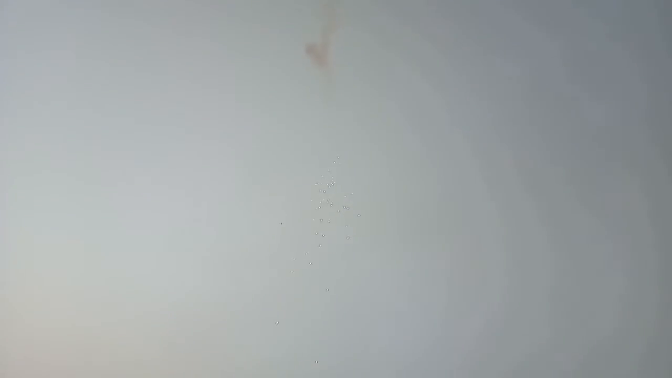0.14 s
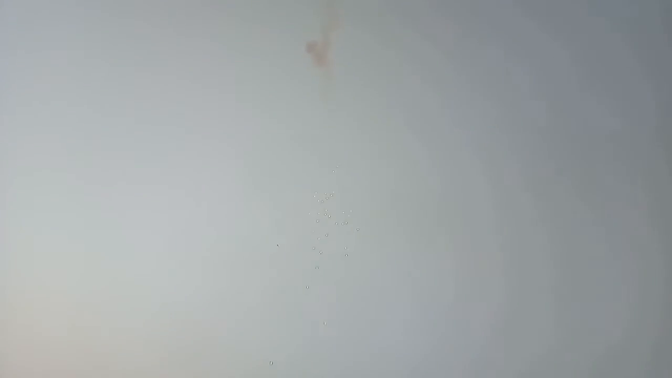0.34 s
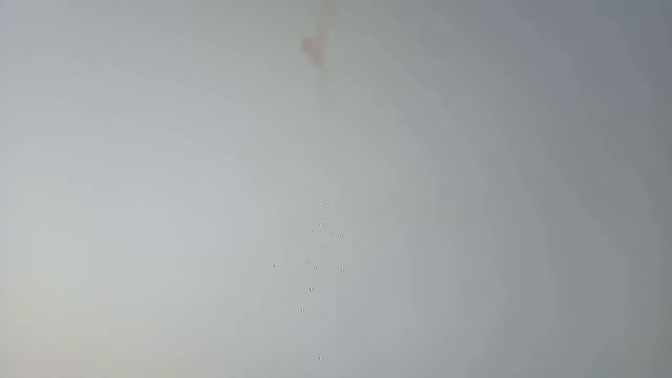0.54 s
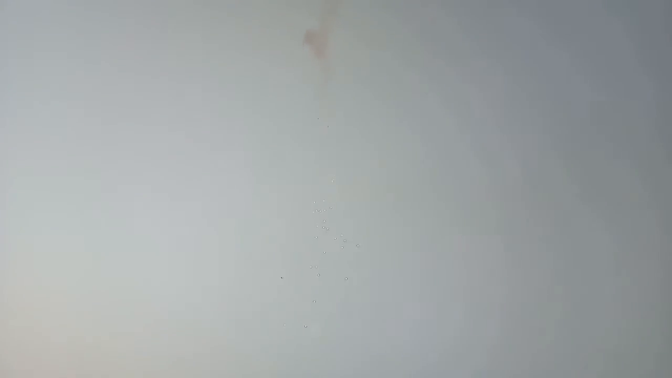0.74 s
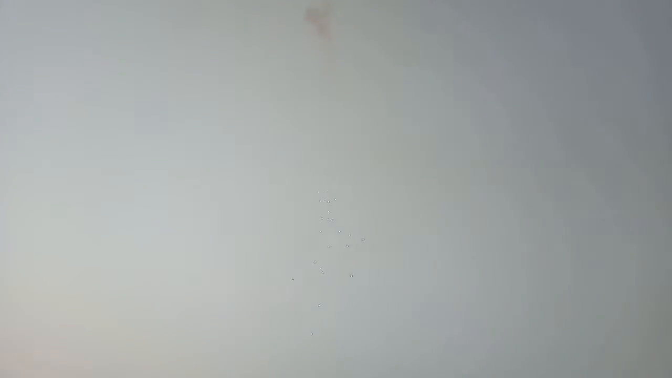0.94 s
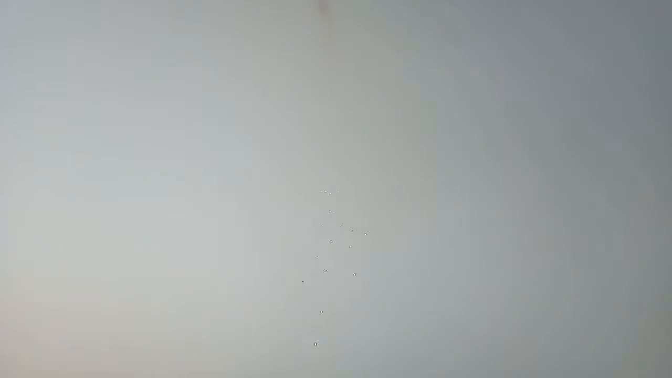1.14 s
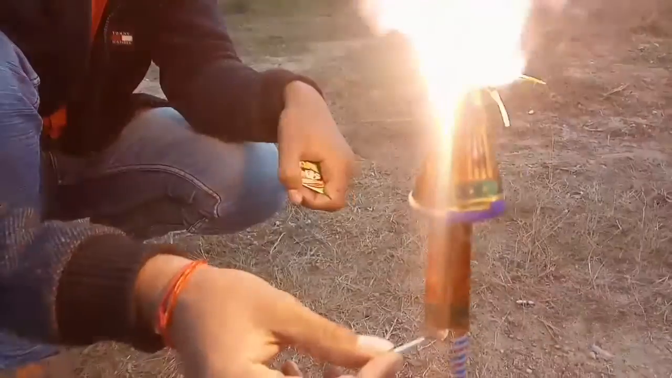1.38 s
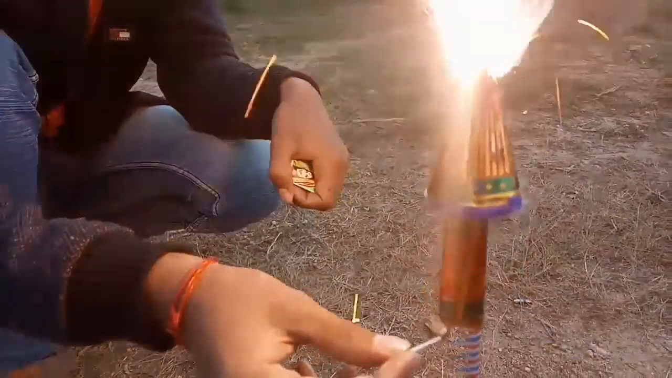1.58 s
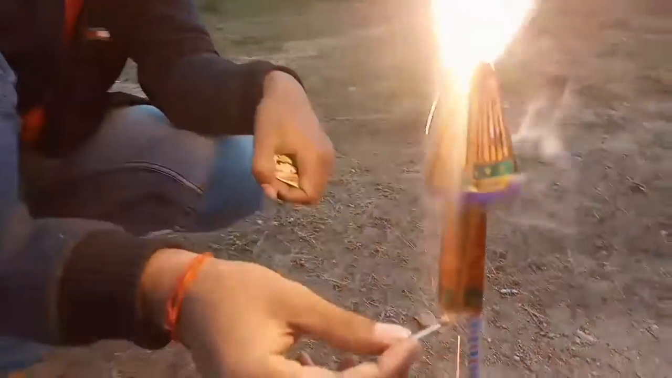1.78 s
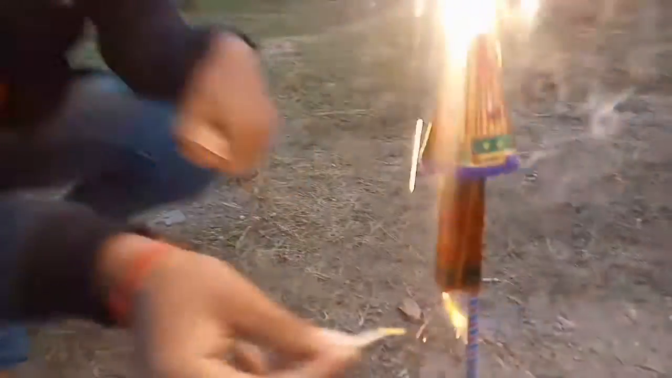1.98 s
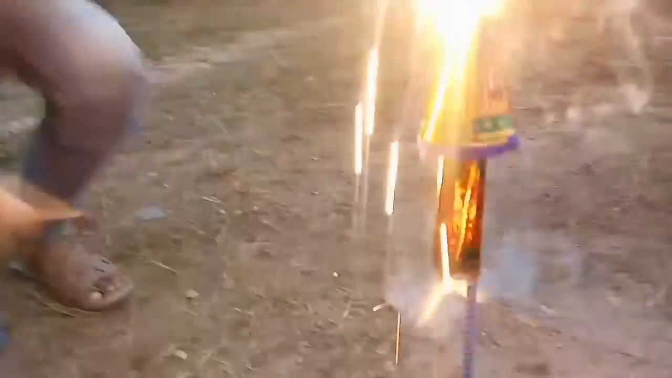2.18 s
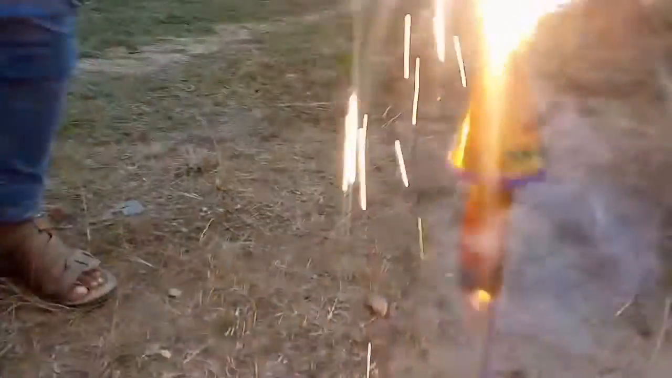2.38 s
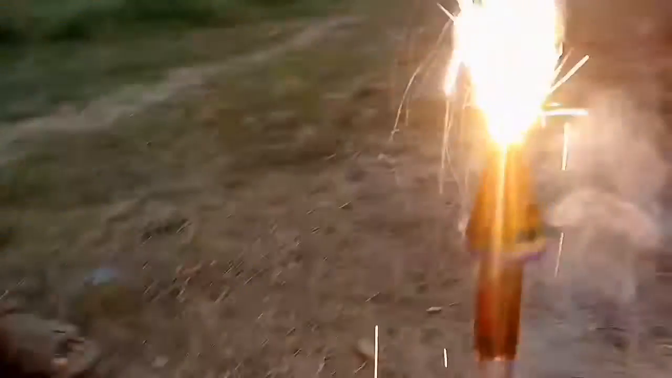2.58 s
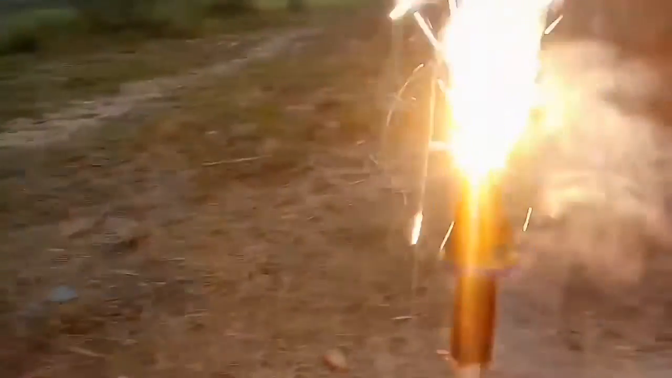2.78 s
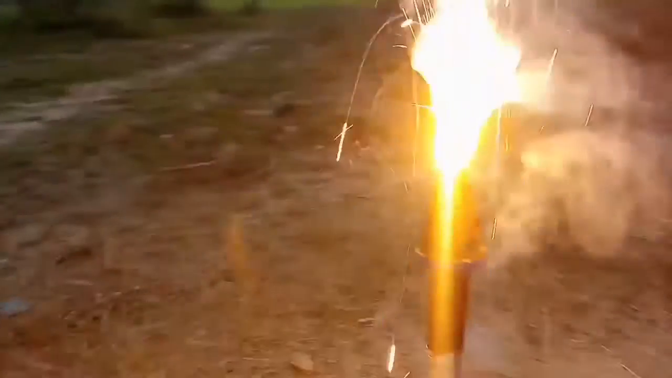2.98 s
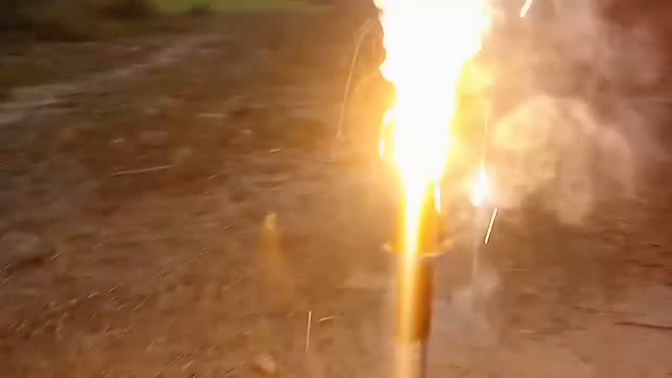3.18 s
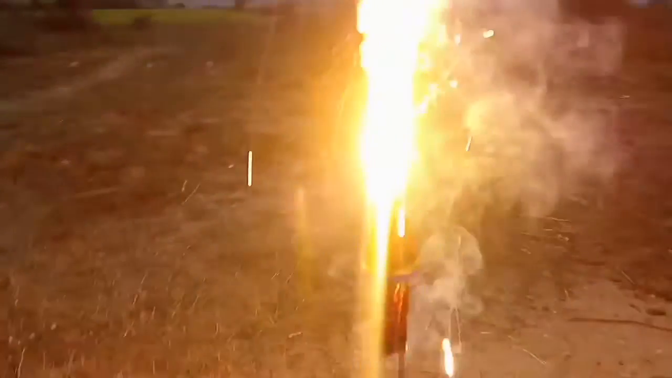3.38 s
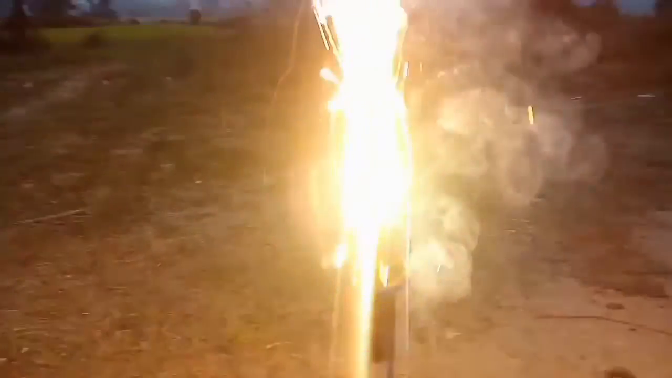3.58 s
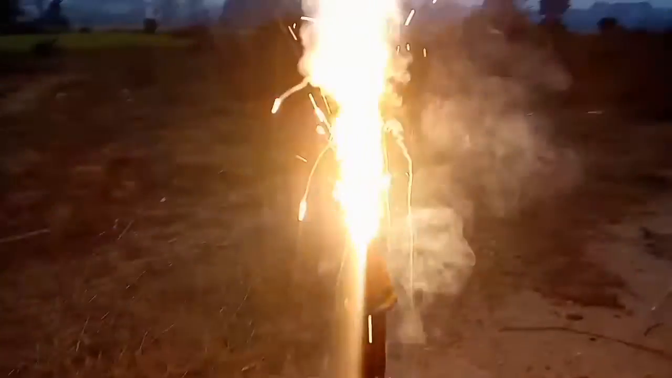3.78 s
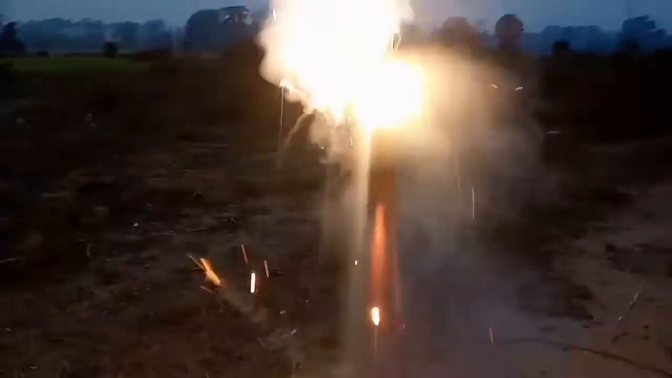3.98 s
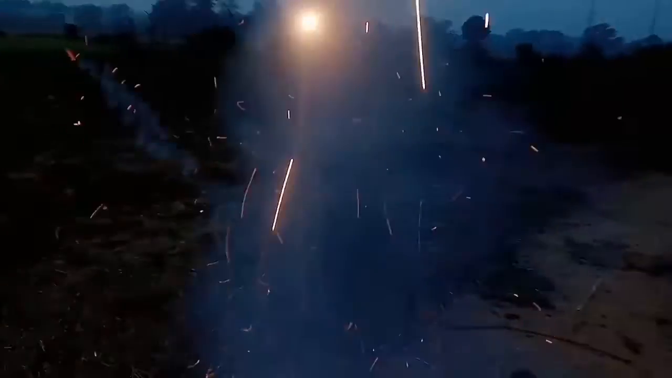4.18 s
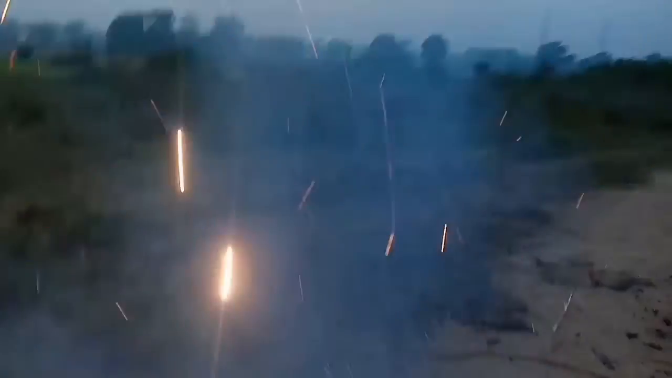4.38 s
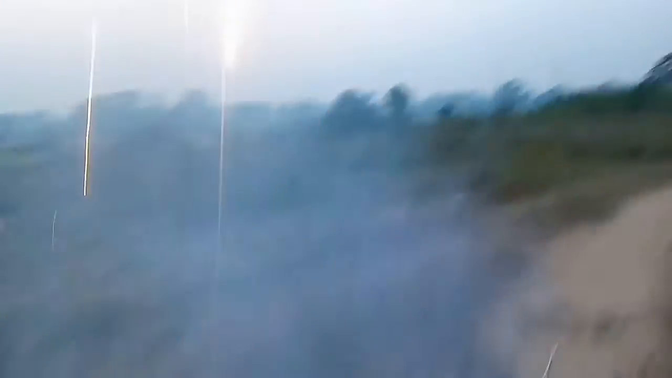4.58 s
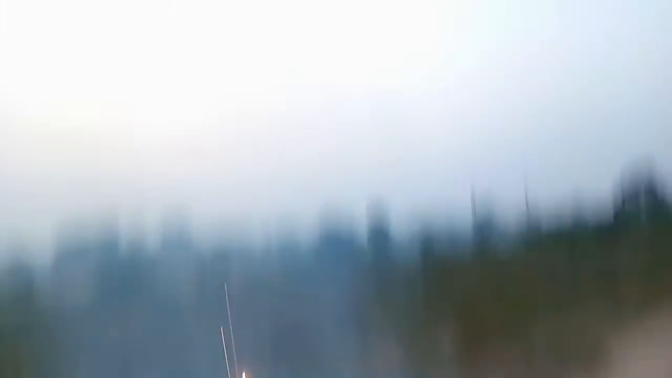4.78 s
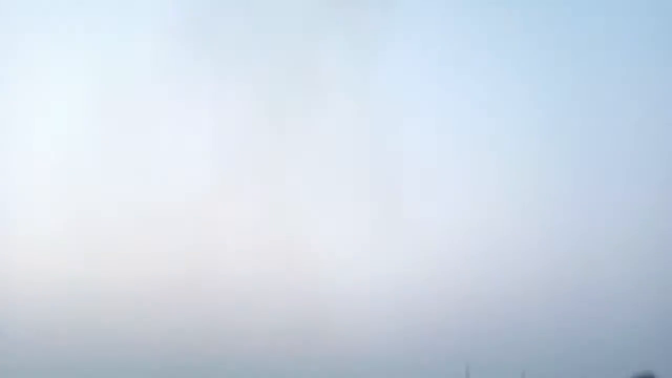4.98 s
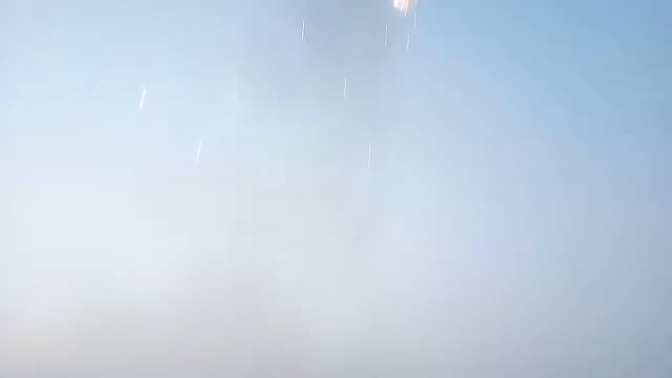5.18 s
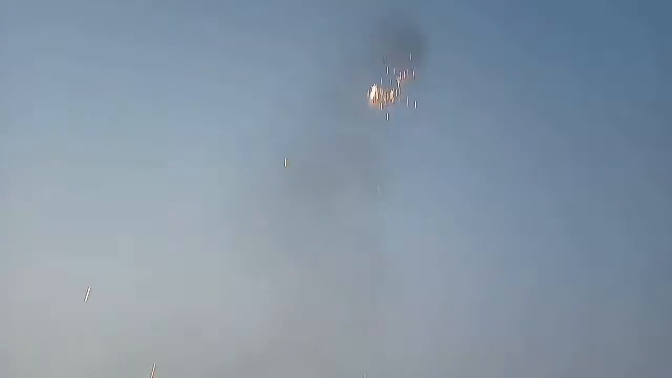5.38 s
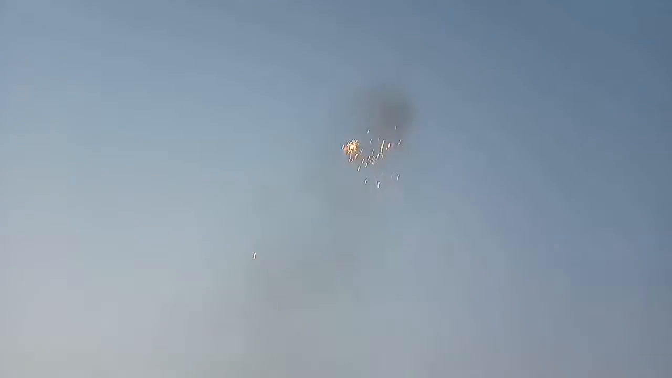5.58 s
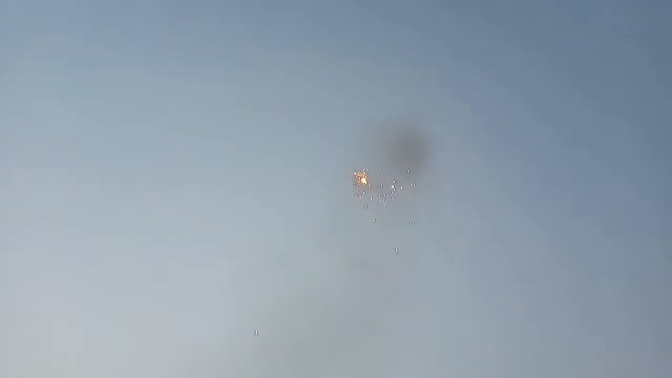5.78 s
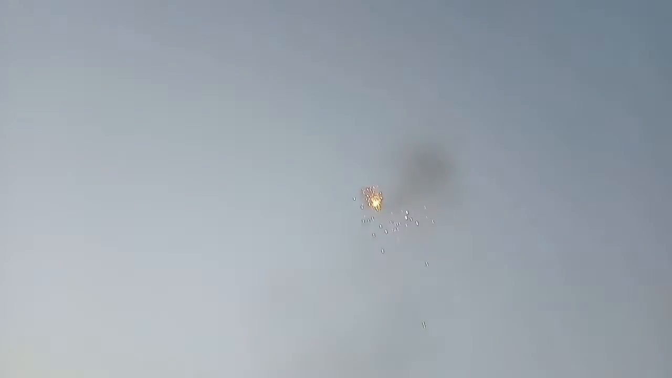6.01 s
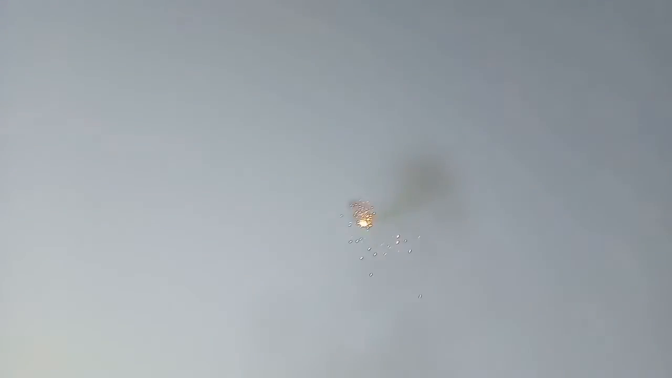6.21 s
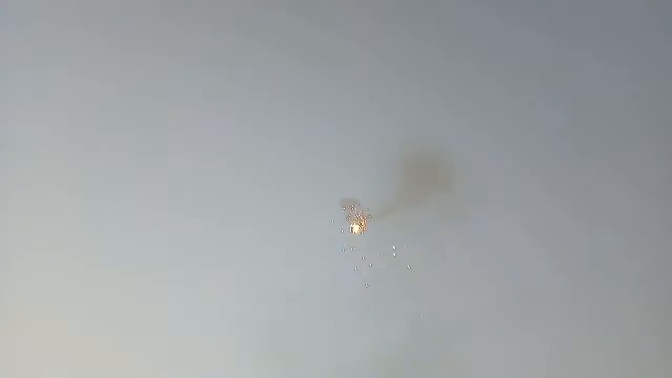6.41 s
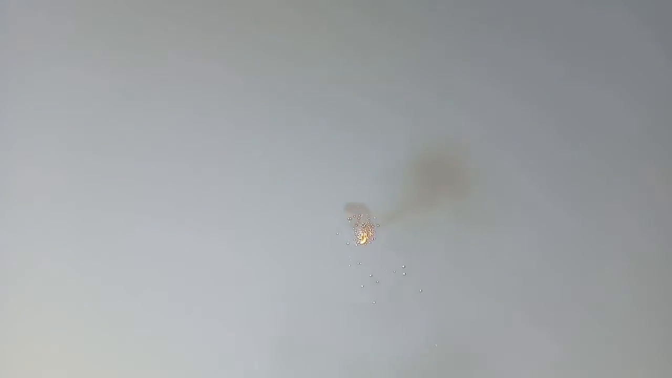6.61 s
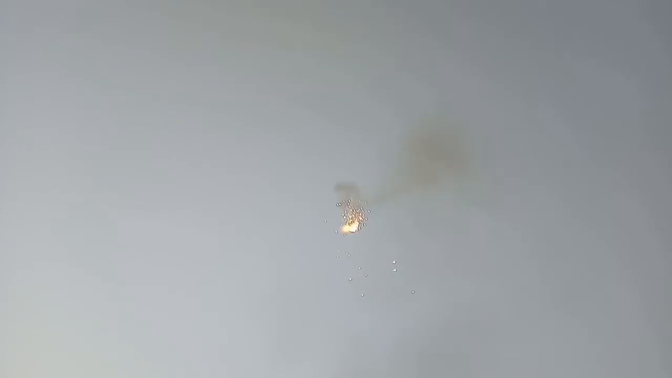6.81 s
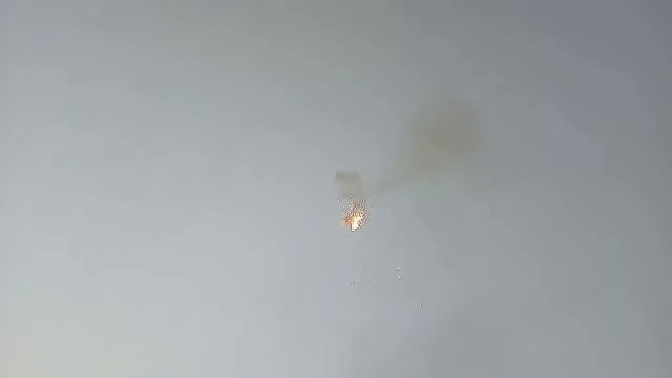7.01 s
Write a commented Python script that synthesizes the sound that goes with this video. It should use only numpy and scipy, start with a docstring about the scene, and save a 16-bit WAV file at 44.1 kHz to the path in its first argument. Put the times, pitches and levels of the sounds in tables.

```python
"""A field at dusk: crickets trill, a far bird whistles and a horn toots twice; the sound fades out and returns.
A fountain firework hisses, pops and snaps, made of noise, grains and clicks; the rocket under it spits, then roars.
As the rocket climbs, its ground echo lags more and more (a falling whoosh) and the air dulls it.
Two far cracks and a hollow rattle follow. Crickets, bird and horn are gliding or steady tones."""
import sys
import numpy as np
from scipy import signal
from scipy.fft import rfft, irfft
from scipy.io import wavfile
from scipy.ndimage import uniform_filter1d, minimum_filter1d

SR = 44100
rng = np.random.default_rng(int(sys.argv[2]) if len(sys.argv) > 2 else 0)


def unload_audio(sound):
    """Save the sound as a 16-bit wav file, at the path given as the first command line argument."""
    columns = np.transpose(np.atleast_2d(sound))
    # keep every value between -1 and 1, then stretch to whole-number steps
    steps = np.round(np.clip(columns, -1, 1) * 32767)
    wavfile.write(sys.argv[1], SR, steps.astype(np.int16))


N = 310905
TIME = np.arange(N) / SR
FREQS = np.maximum(np.fft.rfftfreq(N, 1 / SR), 1)
# All levels in the tables are those of the sources, before echo, air, fades and limiter.


def from_db(db):
    """Turn decibels into a factor for the sound pressure."""
    return 10 ** (np.asarray(db) / 20)


def rms_one(x):
    """Scale a signal so that its average power is one."""
    return x / np.sqrt(np.mean(x ** 2) + 1e-20)


def in_time(rows):
    """Draw straight lines between the rows and read every column at each sample."""
    t, *columns = np.transpose(rows)
    return [np.interp(TIME, t, column) for column in columns]


def ramp(start, length):
    """Rise from zero to one and stay there."""
    return np.clip((TIME - start) / length, 0, 1)


def span(start, end, edge):
    """Slope up after the start, stay at one, and slope down after the end."""
    return np.clip((TIME - start) / edge, 0, 1) * np.clip((end - TIME) / edge + 1, 0, 1)


def swell(middle, half_length):
    """Rise and fall in the shape of a bell."""
    return np.exp(-np.minimum(((TIME - middle) / half_length) ** 2 / 2, 50))


def band(x, low_hz, high_hz, order=2):
    """Keep mainly what lies between two frequencies."""
    edges = [low_hz, min(high_hz, .45 * SR)]
    return signal.sosfilt(signal.butter(order, edges, "band", fs=SR, output="sos"), x + 1e-18)


def drift(rate_hz):
    """Wander slowly and at random, with a spread of one."""
    return rms_one(irfft(rfft(rng.standard_normal(N)) / (1 + (FREQS / rate_hz) ** 2), N))


def coloured(x, spectrum, measured_in):
    """Give a sound its tone colour, with unit power inside one band (f/Hz, f/Hz)."""
    f, level_db = np.transpose(spectrum)
    shaped = rfft(x) * from_db(np.interp(np.log(FREQS), np.log(f), level_db))
    inside = (FREQS > measured_in[0]) & (FREQS < measured_in[1])
    return irfft(shaped, N) / np.std(irfft(shaped * inside, N))


def clicks(rows):
    """Place one single-sample click for each row (t/s, level/dB)."""
    out = np.zeros(N)
    for t, level_db in rows:
        out[round(t * SR)] += from_db(level_db)
    return out


def scattered(x, t60):
    """Scattering sends back many tiny echoes, which fade by 60 dB in t60 seconds."""
    age = TIME[:SR // 2]
    tail = rng.standard_normal(len(age)) * from_db(-60 * age / t60)
    return signal.fftconvolve(x, tail / np.linalg.norm(tail))[:N]


# colour of the low background rumble: f/Hz, level/dB (per Hz)
FIELD_COLOUR = [(25, -14.5), (85, 0.5), (160, -4.5), (235, -21.5), (400, -19), (1400, -29.5), (2200, -45),
                (5000, -46)]
FIELD_DB = -62.5


def field():
    """Low rumble lies under patchy far noise, with one faint rustle early on."""
    rumble = coloured(rng.standard_normal(N) * from_db(1.27 * drift(3.4)), FIELD_COLOUR, (40, 250))
    dip = 1 - span(4.3, 4.7, .25)  # the rumble goes away for a moment
    edges = np.geomspace(300, 3500, num=8)
    patches = np.zeros(N)
    for low, high in zip(edges, edges[1:]):
        noise = band(rng.standard_normal(N), low, high)
        weaker_with_pitch = (low / edges[0]) ** -.9
        patches += noise * from_db(3.2 * drift(10)) * weaker_with_pitch
    rustle = span(0.12, 0.35, 0.064) * rms_one(band(rng.standard_normal(N), 330, 1060))
    return from_db(FIELD_DB) * rumble * dip + from_db(-74.0) * rms_one(patches) + from_db(-69) * rustle


def wing_strokes(per_s, start_hz, end_hz, unevenness, force_db, sharpness):
    """Each wing stroke is a short tone sliding in pitch, with its own length and force; unit power."""
    count = np.cumsum(per_s * (1 + unevenness * drift(30))) / SR
    stroke = count % 1  # how far the present stroke has got
    force = from_db(force_db * rng.standard_normal(N))[count.astype(int)]
    hz = (start_hz + (end_hz - start_hz) * stroke) * (1 + 0.021 * drift(297.8))
    tone = np.sin(2 * np.pi * np.cumsum(hz) / SR)
    return rms_one(force * np.sin(np.pi * stroke) ** sharpness * tone)


# trilling crickets: pulse rate/Hz, f at pulse start/Hz, f at pulse end/Hz, level/dB
CRICKET_TRILLS = [(34.6, 7200, 5600, -67.5), (44.3, 6800, 5300, -70.5), (88.4, 8400, 6300, -70.5),
                  (104, 7400, 5000, -67.5)]
# chirps of a lower-pitched cricket: t of middle/s, level/dB
LOW_CHIRPS = [(0.049, -80), (.22, -79.5), (.645, -74.5), (.88, -74.5), (1.115, -74.5), (1.34, -79),
              (1.55, -82)]


def crickets():
    """Wing strokes make a chorus of trills and one lower chirp, all smeared by the grass."""
    insects = np.zeros(N)
    for per_s, start_hz, end_hz, level_db in CRICKET_TRILLS:
        trill = wing_strokes(per_s, start_hz, end_hz, unevenness=0.11, force_db=3.0, sharpness=1.2)
        insects += from_db(level_db) * trill
    chirping = sum(from_db(level_db) * span(t - .075, t + 0.054, .03) for t, level_db in LOW_CHIRPS)
    insects += chirping * wing_strokes(56, 4750, 3900, unevenness=.08, force_db=2, sharpness=4)
    return insects + from_db(-3.5) * scattered(insects, t60=0.032)


# bird whistles: t start/s, t end/s, t of the arch's crest/s, f at crest/Hz, level/dB
BIRD_WHISTLES = [(0.467, 0.53, 0.57, 1380, -65), (0.96, 1.03, 1.02, 1430, -74),
                 (1.182, 1.45, 1.34, 1524, -64)]
ARCH_HZ_PER_S2, SAG_DB_PER_S, WHISTLE_EDGE_S = 17000, 30, 0.025


def bird():
    """Far whistles follow an arch in pitch, waver a little and weaken as they go."""
    out, waver = np.zeros(N), 1 + 0.0093 * drift(60)
    for start, end, crest_t, crest_hz, level_db in BIRD_WHISTLES:
        held = np.clip(TIME, start, end + WHISTLE_EDGE_S)
        hz = (crest_hz - ARCH_HZ_PER_S2 * (held - crest_t) ** 2) * waver
        gain = from_db(level_db - SAG_DB_PER_S * (held - start)) * span(start, end, WHISTLE_EDGE_S)
        out += gain * np.sin(2 * np.pi * np.cumsum(hz) / SR)
    return out


# horn toots: t start/s, t end/s, f/Hz, level/dB
HORN_TOOTS = [(0.597, 0.69, 849, -64), (1.106, 1.203, 854, -61)]
# the horn's overtones: multiple of the pitch, level/dB
HORN_OVERTONES = [(1, -5.5), (2, -2), (3, -7.5)]


def horn():
    """A far vehicle horn toots twice: a few overtones on one slightly unsteady pitch."""
    out = np.zeros(N)
    for start, end, pitch_hz, level_db in HORN_TOOTS:
        phase = 2 * np.pi * np.cumsum(pitch_hz * (1 + .001 * drift(30))) / SR
        tone = np.zeros(N)
        for multiple, overtone_db in HORN_OVERTONES:
            tone += np.sqrt(2) * from_db(level_db + overtone_db) * np.sin(multiple * phase)
        out += span(start, end, 0.014) * tone
    return out


def burning(grains_per_s, grain_share, flutter_db, flutter_rate):
    """Rushing gas is noise, burning powder grains are tiny random clicks; both flutter together."""
    sizes = from_db(4 * np.minimum(rng.exponential(1, N), 4)) * rng.choice([-1, 1], N)
    grains = rms_one(sizes * (rng.random(N) < grains_per_s / SR))
    return (rng.standard_normal(N) + grain_share * grains) * from_db(flutter_db * drift(flutter_rate))


# how the fountain burns: t/s, spray level/dB, flame level/dB
FOUNTAIN_BURN = [(2.84, -53.5, -64), (2.98, -57, -66.5), (3.22, -52.5, -59), (3.68, -54, -60),
                 (3.94, -49.5, -50.5)]
# colour of the spark spray: f/Hz, level/dB (per Hz)
SPRAY_COLOUR = [(300, -14), (900, -3), (1600, -1.5), (2500, -2), (5000, 1.5), (9000, -2), (14000, -11.5),
                (16000, 1.5)]
# colour of the flame's rumble: f/Hz, level/dB (per Hz)
FLAME_COLOUR = [(30, -15), (75, -16), (150, 4), (230, -2), (400, -3.5), (800, -11), (2000, -35)]


def fountain():
    """A gritty spray of sparks hisses over a soft flame, until the motor takes over."""
    spray_db, flame_db = in_time(FOUNTAIN_BURN)
    sparks = burning(grains_per_s=2500, grain_share=0.86, flutter_db=0.8, flutter_rate=150)
    spray = coloured(sparks, SPRAY_COLOUR, (2500, 12000))
    flame = coloured(rng.standard_normal(N), FLAME_COLOUR, (100, 700))
    return (from_db(spray_db) * spray + from_db(flame_db) * flame) * span(2.0, 3.95, 0.01405)


# sparks that snap close by: t/s, level/dB (of the click before filtering)
SPARK_SNAPS = [(2.2334, -19.5), (2.58, -26), (2.9251, -14.5), (2.9443, -12.5), (3.3918, -28)]


def snaps():
    """Single sparks burst with a very short, bright tick."""
    return band(clicks(SPARK_SNAPS), 2800, 14000, order=1)


# spits of burning powder: t/s, hiss level/dB, thump level/dB, half length/s
POWDER_SPITS = [(2.241, -47, -50, 0.014), (2.633, -49, -64.5, 0.0054), (3.732, -45, -60, 0.003),
                (3.748, -46.5, -63, 0.0057), (3.772, -58, -48.5, 0.011), (3.932, -48.5, -60, 0.019),
                (3.9654, -27.5, -33.5, 0.0021), (3.989, -22, -18.5, 0.0031), (4.012, -22, -20, 0.003),
                (6.38, -55.5, -80, 0.061)]


def spits():
    """Gas swells briefly: a hiss over a thump that reaches into the middle range."""
    hiss, thump = np.zeros(N), np.zeros(N)
    for t, hiss_db, thump_db, half_length in POWDER_SPITS:
        gas = swell(t, half_length)
        hiss += from_db(hiss_db) * gas
        thump += from_db(thump_db) * gas
    high = rms_one(band(rng.standard_normal(N), 3730, 7950))
    middle = rms_one(band(rng.standard_normal(N), 970, 4600))
    low = rms_one(band(rng.standard_normal(N), 75, 920))
    return hiss * high + thump * (low + 0.74 * middle)


# soft pops, each repeated once: t of the first/s, f/Hz, level/dB
SOFT_POPS = [(2.854, 1504, -49), (3.04, 1497, -49), (3.256, 805, -42), (3.445, 1800, -45.5)]
REPEAT_GAP_S, POP_S = 0.018, 0.00072


def pops():
    """Soft pops in the fountain, each heard again after a short fixed gap; every one a very short, rounded tone."""
    out = np.zeros(N)
    for first, hz, level_db in SOFT_POPS:
        for t in (first, first + REPEAT_GAP_S):
            out += from_db(level_db) * swell(t, POP_S) * np.sin(2 * np.pi * hz * (TIME - t))
    return out


# the motor lights, burns for under a second and dies away
IGNITION_S, BURNOUT_S, DYING_DB_PER_S = 3.983, 4.84, 49.5


def launch(full_db, build_db, build_s, leave_s, leaving_s, drop_db):
    """One part of the motor's sound builds with thrust, drops as the rocket leaves and dies after burnout."""
    building = build_db * (1 - ramp(IGNITION_S, build_s))
    leaving = drop_db * ramp(leave_s, leaving_s)
    dying = DYING_DB_PER_S * np.maximum(TIME - BURNOUT_S, 0)
    return from_db(full_db - building - leaving - dying)


def through_air(x, loss_db, shimmer_db):
    """Eddies make narrow bands swell and sink; air dulls with frequency squared (loss given at 10 kHz)."""
    hz, t, frames = signal.stft(x, SR, nperseg=1024)
    loss = np.outer((hz / 10000) ** 2, np.interp(t, TIME, loss_db))
    eddies = uniform_filter1d(rng.standard_normal(frames.shape), size=4, axis=0)
    eddies = uniform_filter1d(eddies, size=12, axis=1)
    shimmer = rms_one(from_db(shimmer_db * rms_one(eddies)))
    return signal.istft(frames * shimmer * from_db(-loss), SR)[1][:N]


# colours of the motor's lumpy roar, bright jet, nozzle hiss and low buffeting: f/Hz, level/dB (per Hz)
ROAR_COLOUR = [(60, -33.5), (150, -8.5), (290, -4.5), (420, -1.5), (620, -1), (800, 0), (1200, -1),
               (1800, -4.5), (3000, -12), (6000, -54)]
JET_COLOUR = [(500, -27), (1200, -3.5), (1800, -1.5), (2400, -1), (3600, 0.5), (5000, -0.5), (7500, -3.5),
              (9500, -10.5), (13500, -17), (16000, -11.5)]
NOZZLE_COLOUR = [(2500, -26), (4500, -8), (5700, -2), (6700, -3), (7800, -7), (9500, -18), (14000, -20.5),
                 (16000, -5)]
BLAST_COLOUR = [(25, -18), (75, -10.5), (100, -1), (160, 0), (220, -6.5), (380, -3), (900, -28)]
# stumbles while lifting off: t/s, depth of the dip level/dB
LIFTOFF_STUMBLES = [(4.234, 4), (4.342, 13.5)]
STUMBLE_S = 0.011
# flares of the fountain high up: t/s, level/dB, half length/s
HIGH_FLARES = [(6.08, -66.5, 0.15), (6.325, -62.5, 0.091), (6.763, -63.5, 0.055)]
# high up the fountain burns on, slowly receding
ALOFT_ROAR_DB, ALOFT_JET_DB, RECEDING_DB_PER_S = -56, -67.5, 1.42
# treble lost at 10 kHz in flight, and the further loss when the sound dulls near the top
AIR_LOSS_DB, TOP_LOSS_DB, DULLS_AT_S, DULLING_S = 1.0, 11, 6.5, 0.43


def rocket():
    """The motor lights at once: roar and jet, with nozzle hiss and buffeting near the ground."""
    roar = burning(grains_per_s=540, grain_share=0.23, flutter_db=-0.1, flutter_rate=54)
    roar = coloured(roar, ROAR_COLOUR, (250, 1400))
    jet = burning(grains_per_s=5000, grain_share=0.39, flutter_db=1.0, flutter_rate=93)
    jet = coloured(jet, JET_COLOUR, (1800, 5000))
    nozzle = coloured(rng.standard_normal(N) * from_db(2.6 * drift(120)), NOZZLE_COLOUR, (5700, 7800))
    blast = coloured(rng.standard_normal(N) * from_db(4.2 * drift(25)), BLAST_COLOUR, (40, 220))
    stumbling = from_db(-sum(dip_db * swell(t, STUMBLE_S) for t, dip_db in LIFTOFF_STUMBLES))

    motor = roar * stumbling * launch(full_db=-20.5, build_db=19, build_s=0.2,
                                      leave_s=4.38, leaving_s=0.063, drop_db=19.5)
    motor += jet * launch(full_db=-19.5, build_db=13.5, build_s=0.29,
                          leave_s=4.364, leaving_s=0.17, drop_db=12.5)
    near_ground = nozzle * launch(full_db=-23.5, build_db=6.0, build_s=0.089,
                                  leave_s=4.17, leaving_s=0.15, drop_db=6)
    near_ground += blast * stumbling * launch(full_db=-30, build_db=5, build_s=0.25,
                                              leave_s=4.42, leaving_s=0.066, drop_db=21.5)

    receding = from_db(-RECEDING_DB_PER_S * (TIME - BURNOUT_S)) * ramp(BURNOUT_S, 0.52)
    flaring = sum(from_db(level_db) * swell(t, half_length) for t, level_db, half_length in HIGH_FLARES)
    aloft = receding * (from_db(ALOFT_ROAR_DB) * roar + from_db(ALOFT_JET_DB) * jet) + flaring * jet

    lit = motor + near_ground * (1 - ramp(4.5, 0.066)) + aloft
    loss_db = AIR_LOSS_DB + TOP_LOSS_DB * ramp(DULLS_AT_S, DULLING_S)
    return through_air(lit * ramp(IGNITION_S, 0.0028), loss_db, shimmer_db=2.5)


# dull cracks from high up: t/s, level/dB
HIGH_CRACKS = [(5.2983, -25.5), (5.3128, -25.5)]


def cracks():
    """Distance leaves one pressure swing of each crack, and a faint scatter after it."""
    lag = np.arange(-200, 201) / SR
    swing = -np.sin(2 * np.pi * 980 * lag) * np.exp(-(lag / 0.00061) ** 2)
    direct = np.convolve(clicks(HIGH_CRACKS), swing, "same")
    return direct + from_db(-8) * scattered(direct, t60=0.32)


# knocks of a short hollow rattle: t/s, level/dB
RATTLE_KNOCKS = [(6.154, -38.5), (6.1635, -37.5), (6.173, -47), (6.183, -49), (6.205, -43)]
# the tones it rings with: f/Hz, level/dB, time to fade by 60 dB/s
RATTLE_TONES = [(105, -20, 0.088), (267, -7.5, 0.13), (740, -17, .03), (818, -3, 0.064),
                (1680, -1.5, 0.011)]


def rattle():
    """Quick knocks make something hollow ring in a few fading tones, with faint bright ticks."""
    knocks = clicks(RATTLE_KNOCKS) + 1e-18
    out = from_db(5) * band(scattered(knocks, t60=.015), 1500, 14000, order=1)
    for hz, level_db, t60 in RATTLE_TONES:
        decay, turn = from_db(-60 / (t60 * SR)), 2 * np.pi * hz / SR  # per sample
        ring = signal.lfilter([0, np.sin(turn)], [1, -2 * decay * np.cos(turn), decay * decay], knocks)
        out += from_db(level_db) * ring
    return out


def ground_echo(x, lag_ms, strength, dull_hz):
    """The ground returns a later, duller copy; a changing lag makes the tone colour sweep."""
    soft = signal.sosfilt(signal.butter(1, min(dull_hz, .45 * SR), fs=SR, output="sos"), x + 1e-18)
    echo = np.interp(TIME - lag_ms / 1000, TIME, soft)
    return (x + strength * echo) / np.sqrt(1 + strength ** 2 / 2)


# the whole sound fades out, comes back a little louder and drops out once: t start/s, t end/s
FADE_OUT, FADE_IN, DROPOUT = (1.41, 1.619), (2.158, 2.894), (2.703, 2.736)
RETURN_DB = 4


def fades():
    """The loudness sinks to silence, swells back and drops sharply for an instant."""
    leaving = np.interp(TIME, FADE_OUT, [1, 0]) ** 0.55
    returning = from_db(RETURN_DB) * np.interp(TIME, FADE_IN, [0, 1]) ** 1.5
    return (leaving + returning) * from_db(-44 * span(*DROPOUT, 0.005))


# the rocket's ground echo lags more with height: fastest at mid climb, then levelling off
LAG_LOW_MS, LAG_HIGH_MS, MID_CLIMB_S, CLIMB_EASE_S = 3.35, 8.4, 5.15, 0.2497
EASING_DB_PER_S = 0.5  # the background slowly gets softer


def scene():
    """The firework with its ground echo stands in front of the evening field."""
    on_ground = fountain() + snaps() + pops() + spits()
    firework = ground_echo(on_ground, lag_ms=2.5, strength=0.24, dull_hz=6100)
    height = 1 / (1 + np.exp((MID_CLIMB_S - TIME) / CLIMB_EASE_S))  # from 0 to 1
    lag_ms = LAG_LOW_MS + (LAG_HIGH_MS - LAG_LOW_MS) * height
    mirrored = 0.12 + 0.38 * ramp(4.36, 0.206)  # the echo is clearer once the rocket has left the ground
    firework += ground_echo(rocket(), lag_ms, strength=mirrored, dull_hz=6900)

    far = horn() + bird()
    evening = field() + crickets() + far + from_db(-8) * scattered(far, t60=0.25)
    evening = evening * from_db(-EASING_DB_PER_S * TIME)
    return ((firework + cracks() + rattle() + evening) * fades())[None]


# resonances of the microphone port: f/Hz, width/Hz, level/dB (boost at the peak)
PORT_RESONANCES = [(6350, 890, 5), (7065, 820, 6), (14870, 530, 11)]
CUTOFF_HZ, CEILING = 15750, .74


def record(dry):
    """The microphone port rings in the treble, a fast limiter holds the peaks and the top is cut."""
    out = dry
    for hz, width_hz, boost_db in PORT_RESONANCES:
        ringing = signal.lfilter(*signal.iirpeak(hz, hz / width_hz, fs=SR), out)
        out = out + (from_db(boost_db) - 1) * ringing
    allowed = minimum_filter1d(CEILING / np.maximum(np.abs(out), CEILING), size=60)
    out = out * uniform_filter1d(allowed, size=60)
    return signal.sosfilt(signal.ellip(12, .2, 80, CUTOFF_HZ, fs=SR, output="sos"), out)


dry = scene()
out = record(dry)
unload_audio(out)
```